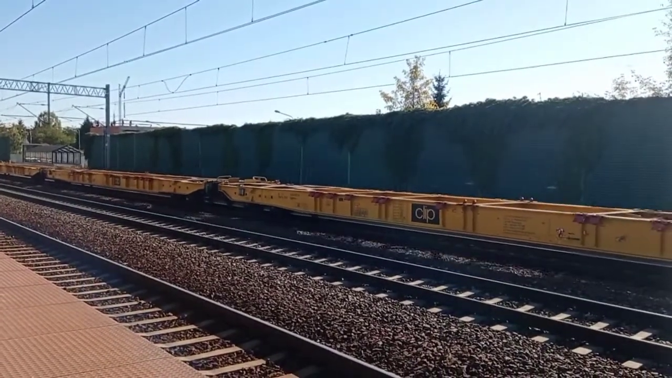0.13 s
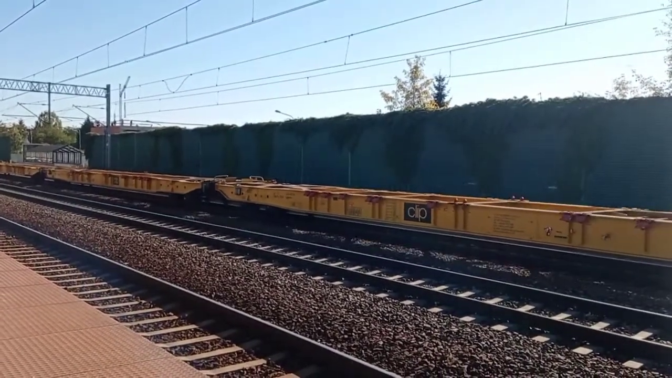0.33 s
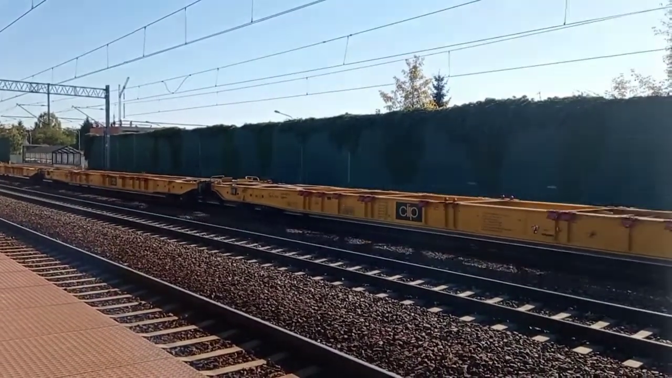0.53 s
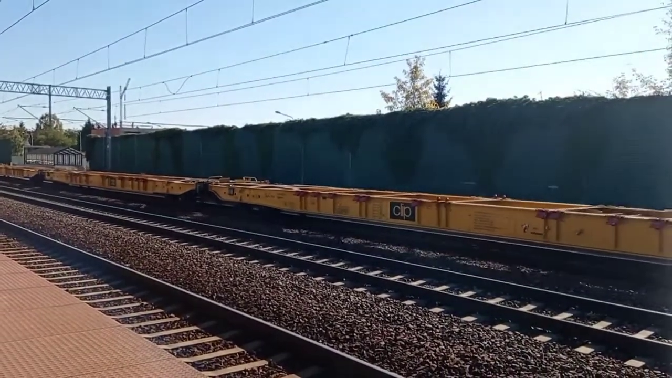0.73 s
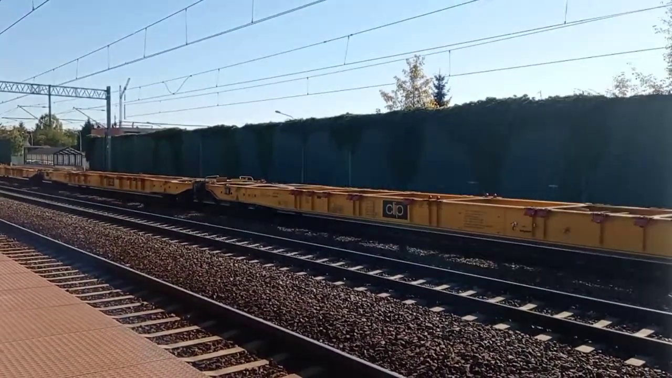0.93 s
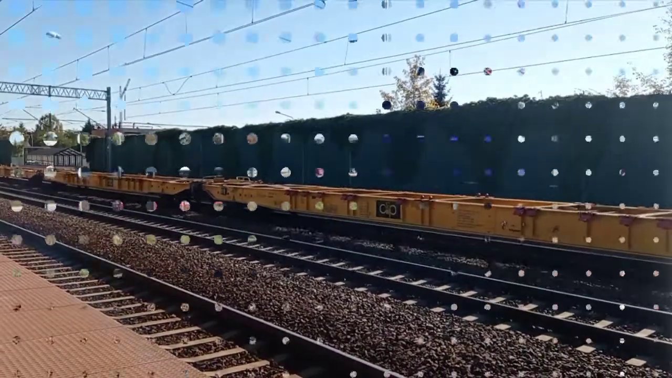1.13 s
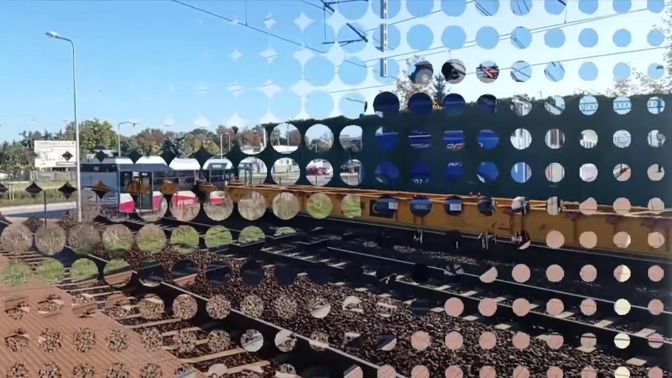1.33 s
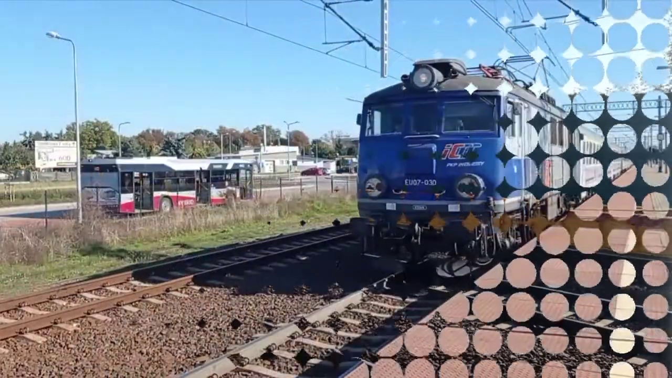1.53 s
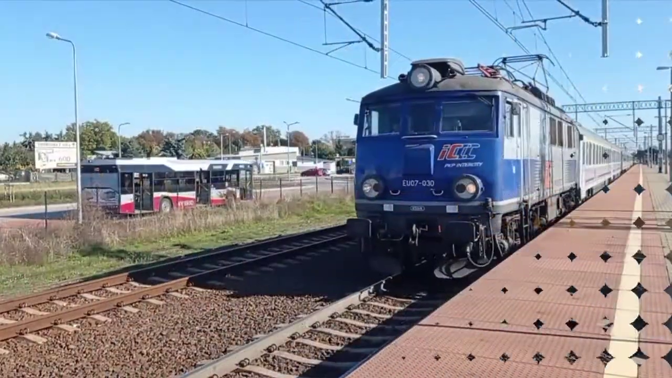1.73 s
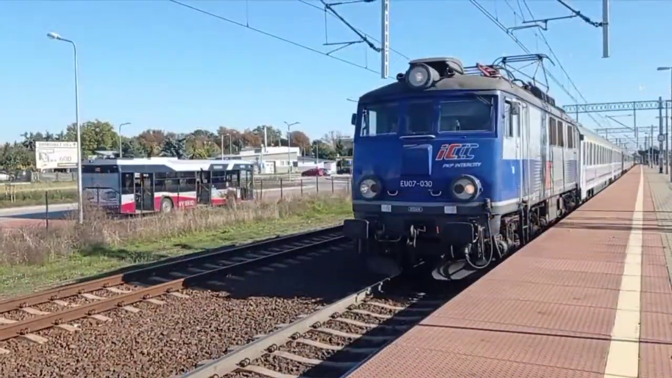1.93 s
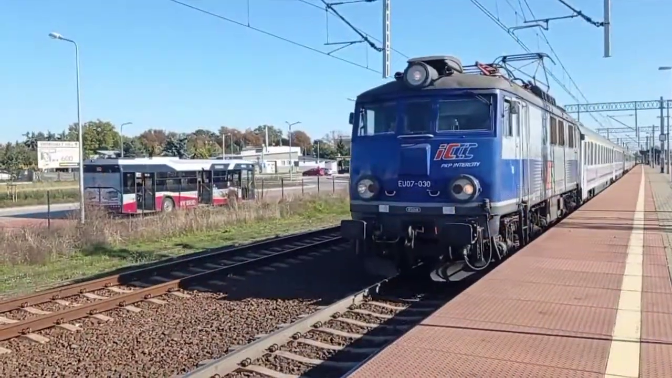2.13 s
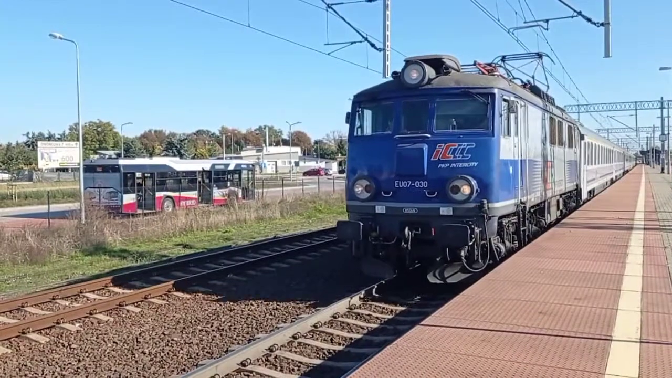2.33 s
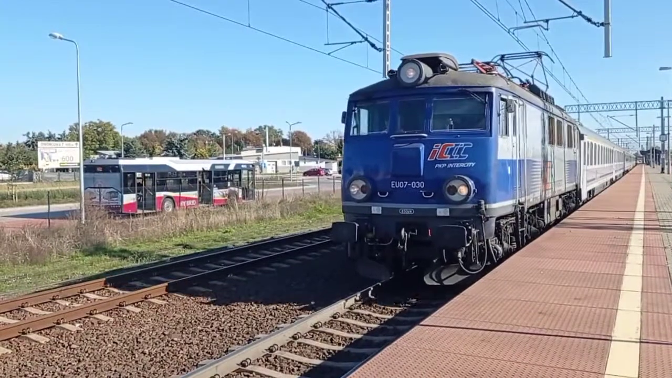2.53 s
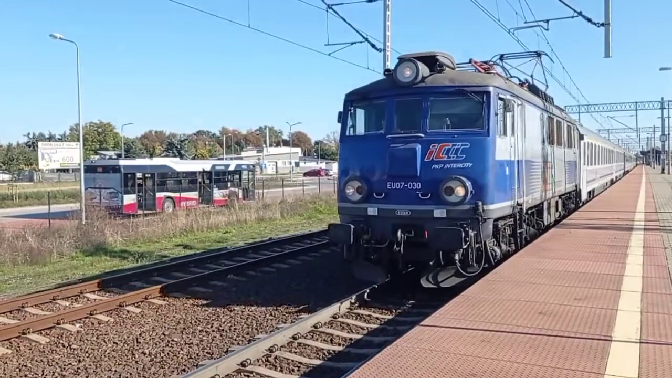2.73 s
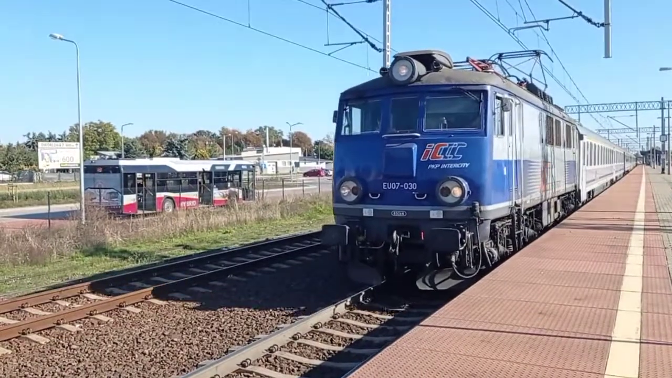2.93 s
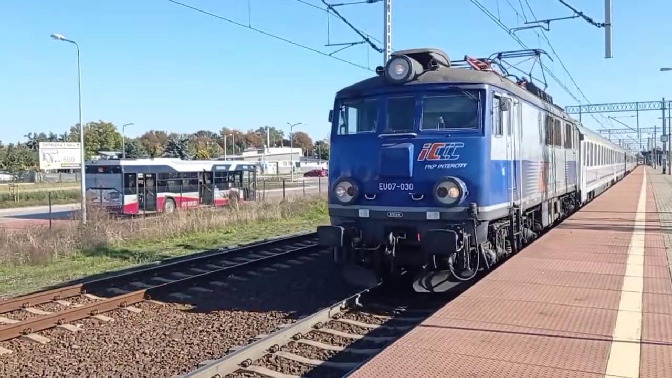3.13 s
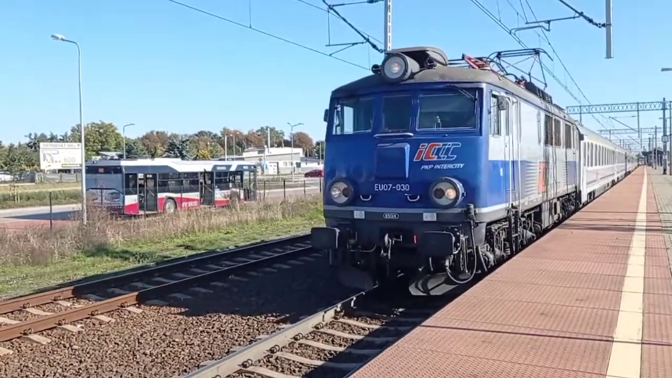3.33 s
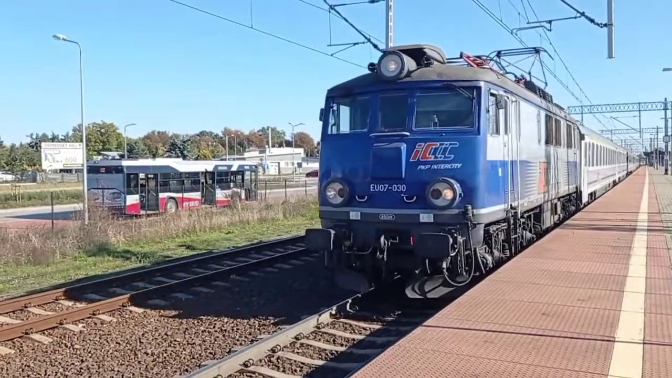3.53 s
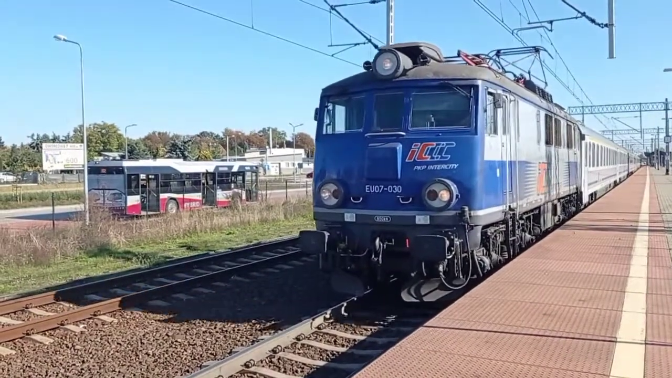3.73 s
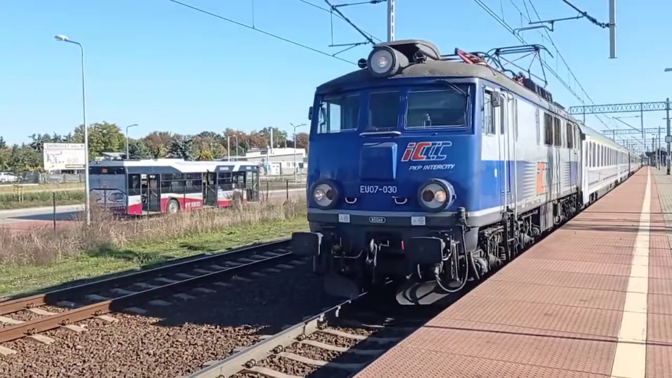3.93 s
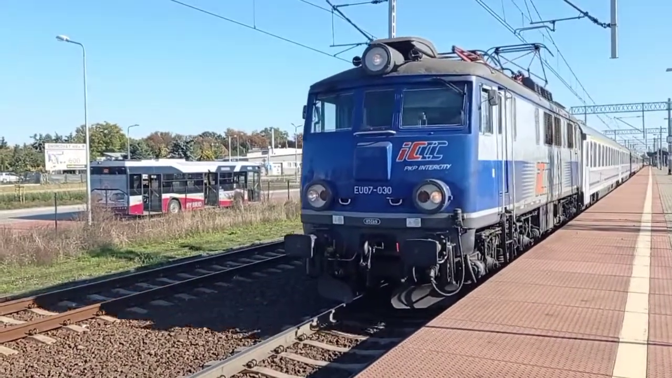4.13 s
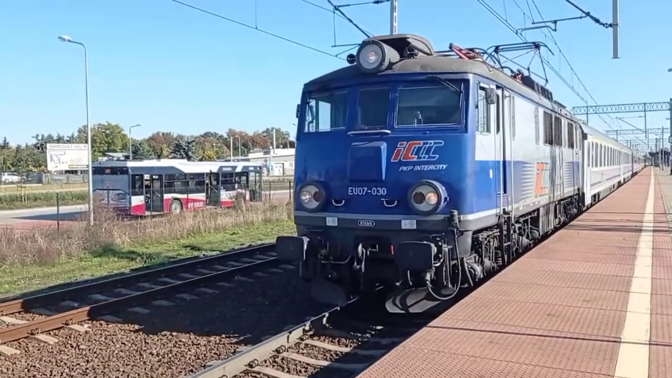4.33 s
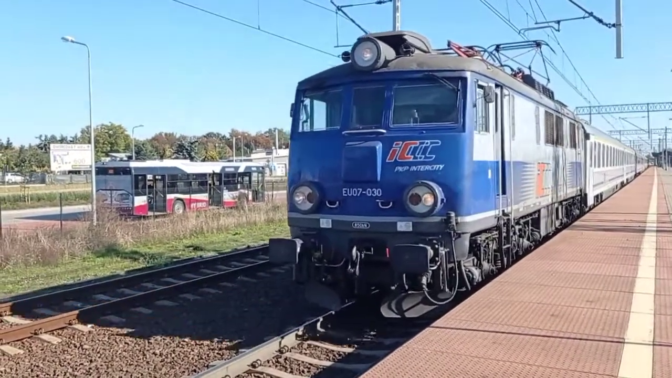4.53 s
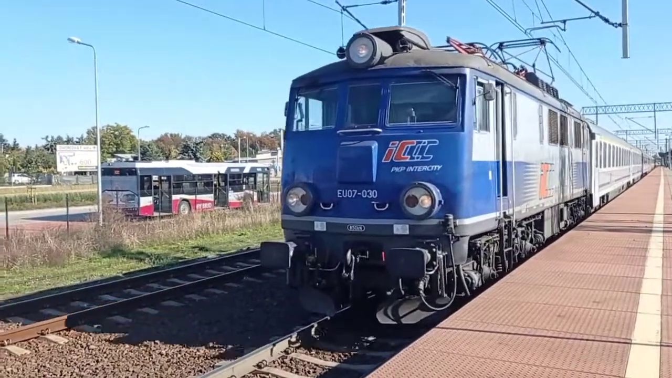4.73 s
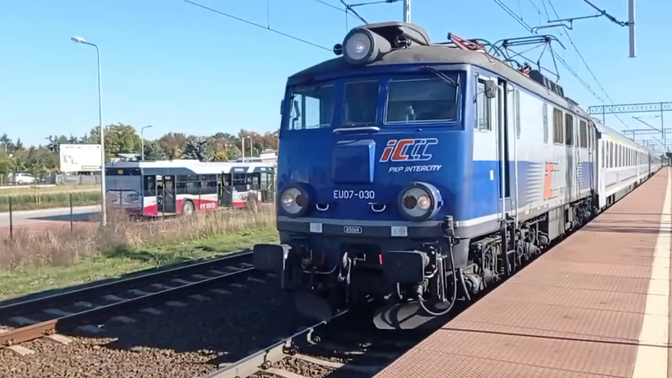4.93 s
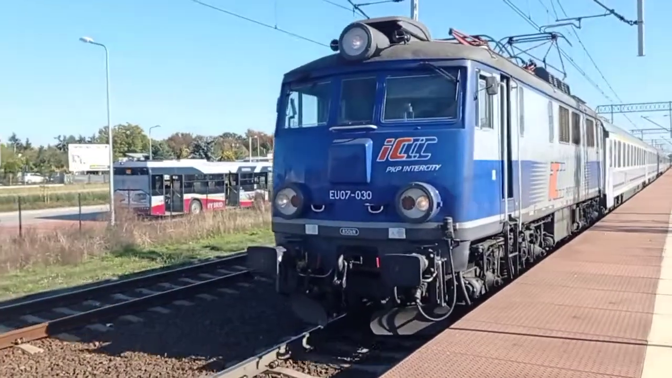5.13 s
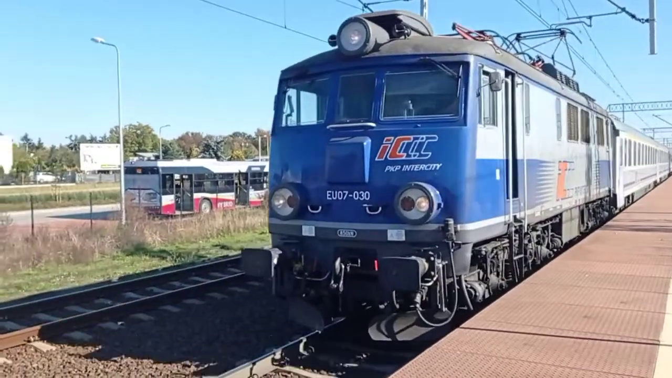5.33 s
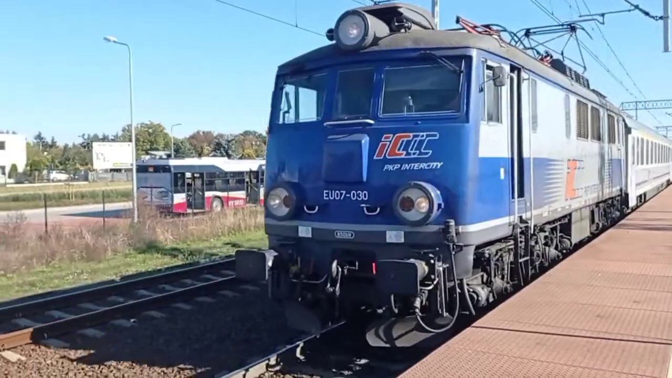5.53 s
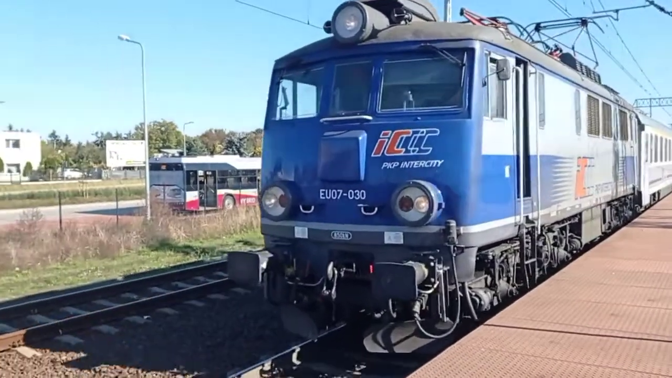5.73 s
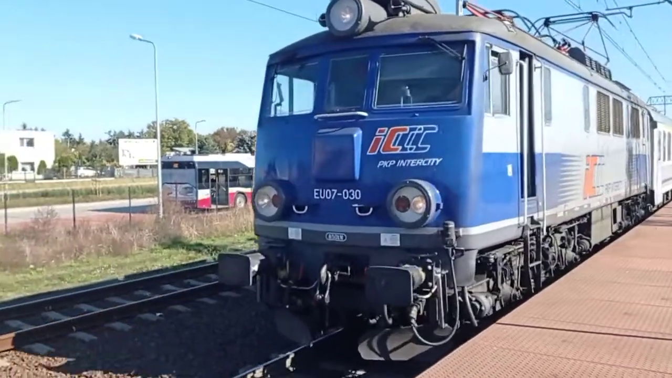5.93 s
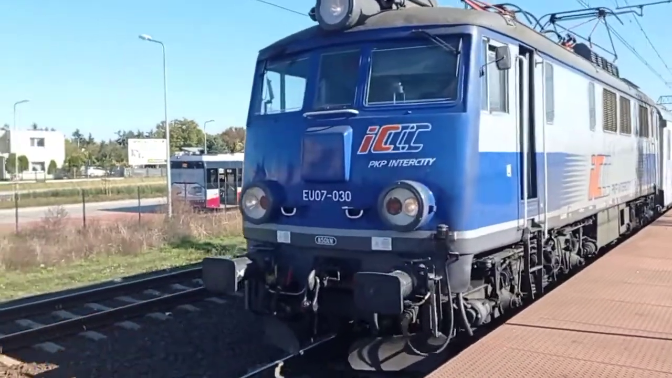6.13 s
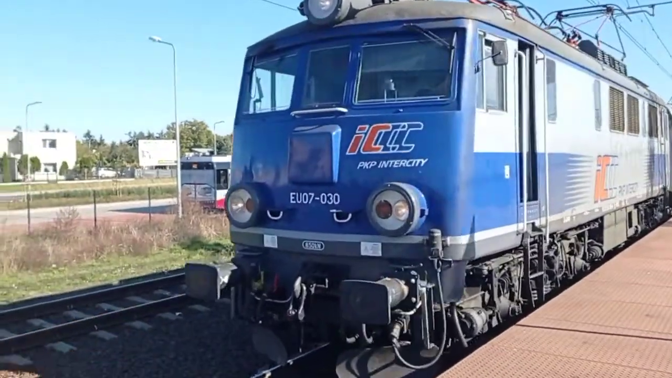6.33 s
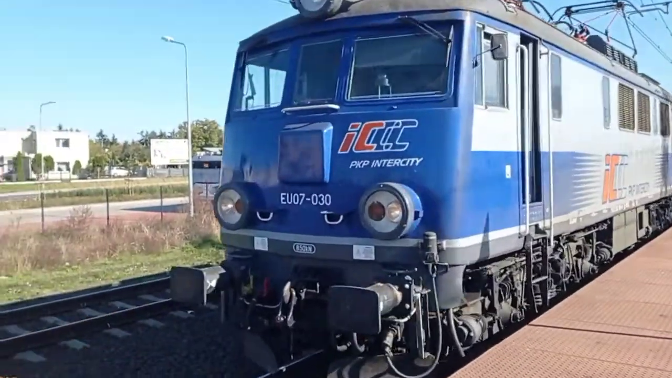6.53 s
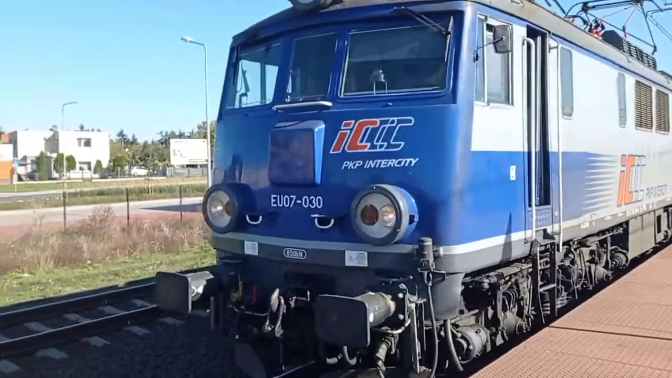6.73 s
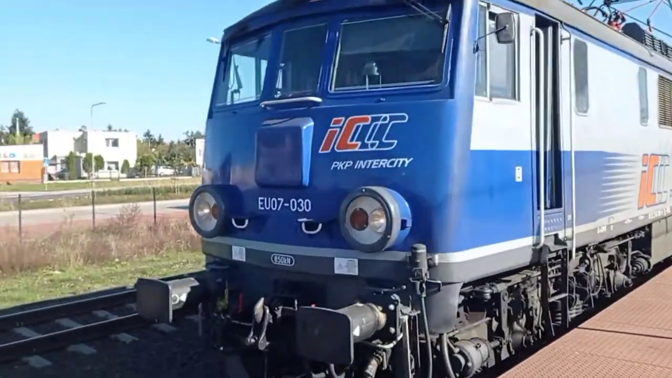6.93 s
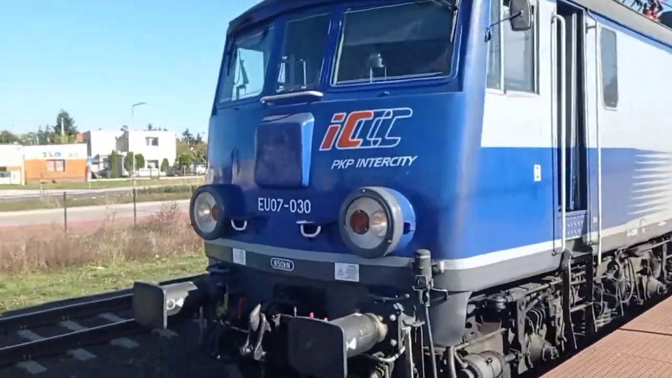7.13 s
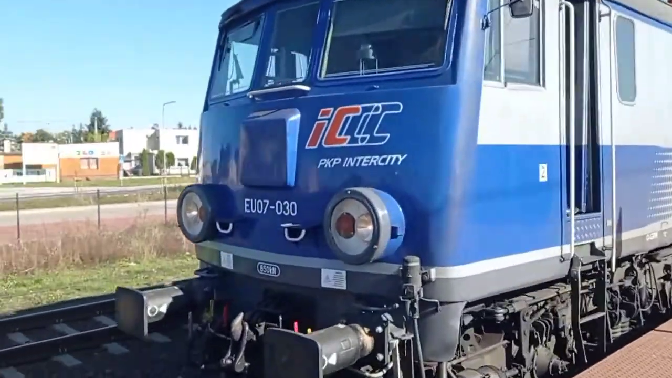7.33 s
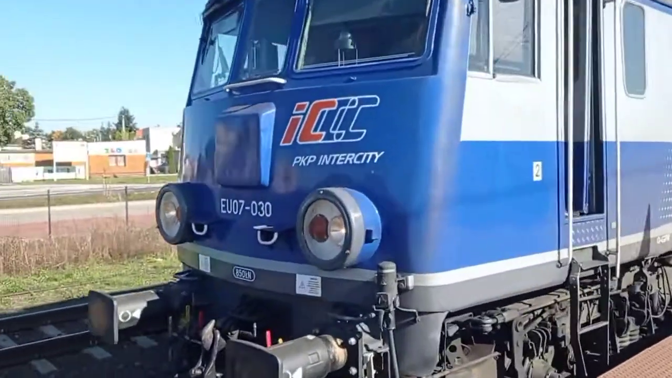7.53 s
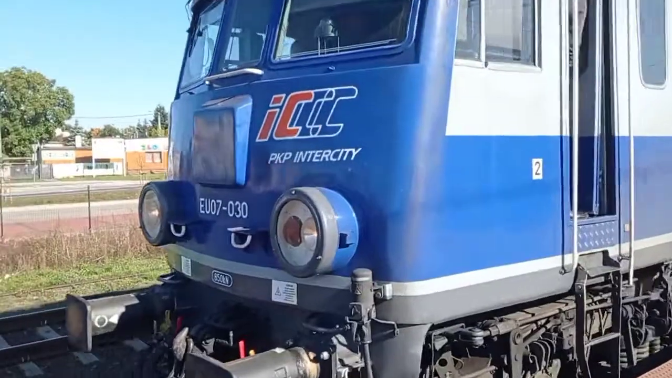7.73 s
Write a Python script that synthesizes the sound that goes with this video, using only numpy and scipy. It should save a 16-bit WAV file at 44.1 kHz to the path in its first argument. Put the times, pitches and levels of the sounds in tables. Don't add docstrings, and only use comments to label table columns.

```python
import sys
import numpy as np
from scipy import signal
from scipy.fft import rfft, irfft, next_fast_len
from scipy.io import wavfile

SR = 44100
rng = np.random.default_rng(int(sys.argv[2]) if len(sys.argv) > 2 else 0)


def convert_level_to_amplitude(level_db):
    exponent = np.asarray(level_db, float) / 20
    return 10 ** exponent


def transcribe(u):
    v = np.clip(np.atleast_2d(u).T, -1, 1)
    q = np.round(v * 32767).astype(np.int16)
    wavfile.write(sys.argv[1], SR, q)


N = 343539

# (time [s], tooth pitch [Hz], tooth level [dB], side tone level [dB])
GEAR_TONES = [(1.05, 207.5, -43.5, -46), (1.6, 221.5, -38.5, -36.5), (1.79, 225.5, -40, -36),
              (2.0, 231, -49, -56), (2.27, 237.9, -34.5, -35), (3.1, 250.2, -34.5, -31.5),
              (3.7, 255.8, -38, -42), (4.05, 260.5, -30, -43), (4.5, 266.2, -32.5, -38),
              (5.0, 278.5, -26.5, -51), (5.2, 285.7, -30, -40), (5.47, 284.8, -28, -36),
              (5.9, 293.2, -38.5, -31), (6.27, 303, -27.5, -26.5), (6.55, 302, -23, -23.5),
              (7.0, 306.4, -24.5, -26), (7.35, 306.1, -19.5, -25.5), (7.79, 307.4, -16, -28.5)]
# (time [s], level [dB])
APPROACH = [(1.05, -50.5), (2.2, -48.5), (3.1, -46.5), (4.1, -45), (4.4, -44), (5.2, -42.5), (5.75, -40.5),
            (6.4, -39.5), (7.2, -38), (7.79, -36.5)]
# (time [s], share [0-1])
NEARNESS = [
    (4.0, 0.16),
    (5.5, 0.39),
    (6.5, 0.6),
    (7.2, 0.73),
]

# (time [s], hold [s], peak level [dB])
LOW_SQUEALS = [(1.06, 0.035, -48.5), (1.11, .03, -51), (1.67, 0.074, -53.5), (1.76, 0.035, -47.5),
               (1.9, .05, -64), (2.1, 0.014, -52), (2.16, 0.017, -49), (2.34, 0.06, -45), (2.5, 0.028, -59),
               (2.65, 0.11, -41.5), (2.9, .04, -58), (3.07, 0.014, -51.5), (3.33, 0.09, -43),
               (3.5, 0.14, -43.5), (3.8, .02, -56), (3.95, .07, -46.5), (4.325, 0.028, -39),
               (4.48, .05, -58), (5.24, .03, -54), (5.57, 0.028, -46.5), (5.76, 0.036, -49),
               (6.1, 0.036, -46.5), (6.2, 0.091, -39), (6.465, .03, -48), (7.58, 0.022, -52)]
# (time [s], hold [s], peak level [dB])
HIGH_SQUEALS = [(2.0, 0.018, -61), (2.22, 0.025, -62), (2.33, 0.028, -52), (3.25, 0.011, -49),
                (3.88, 0.13, -57), (4.15, .04, -59), (4.5, .05, -55), (5.46, 0.091, -42.5),
                (5.66, .02, -52), (5.72, .03, -51), (5.79, .02, -50), (6.035, 0.011, -43.5),
                (6.2, .08, -57), (6.46, 0.027, -52), (6.73, 0.023, -51), (7.37, 0.018, -60),
                (7.58, .12, -52)]
# (time [s], pitch [Hz])
HIGH_SQUEAL_PITCH = [(1.0, 6820), (2.3, 6865), (3.3, 6825), (4.5, 6815), (5.4, 6905), (5.8, 6890),
                     (6.05, 6850), (7.0, 6850)]
# (pitch multiple [1], level
# [dB], steepness of growth [1])
SQUEAL_PARTIALS = [(1.135, -27, 1.5), (1.5, -37, 1.5), (2.0, -44, 1.6), (2.06, -55, 1.6), (2.36, -59, 1.5)]

# (frequency [Hz], level [dB per Hz])
RUMBLE_FAR = [(13, -61), (22, -27), (38, -26), (81, -4), (183, -5), (241, -3), (257, -11.5), (285, -3),
              (375, -10), (500, -26.5), (650, -55.5), (1100, -120)]
RUMBLE_NEAR = [(13, -65.5), (22, -46.5), (102, -14), (156, -13), (198, -10), (244, -3.5), (274, -11),
               (296, -16.5), (316, -19), (347, -9), (500, -32.5), (650, -54.5), (1100, -120)]
BLOWER_FAR = [(240, -28.5), (400, 0), (460, -3), (493, -3.5), (535, -7), (583, -4), (698, 1.5), (917, 2.5),
              (1490, -17), (1600, -15), (2080, -44.5), (3520, -120)]
BLOWER_NEAR = [(240, -26), (400, 3.5), (522, -5.5), (573, 1.5), (600, 2), (678, -7), (770, -4.5), (944, -8),
               (1220, -10), (1600, -28.5), (2080, -47.5), (3520, -120)]
HISS_FAR = [(820, -29), (1400, -5.5), (1520, -9), (1850, 3.5), (2140, -10), (2360, -4.5), (2590, -3),
            (2860, -11.5), (3390, -7.5), (4410, -19), (5850, -18), (6690, -13), (7600, -26), (9880, -53.5),
            (16700, -120)]
HISS_NEAR = [(820, -26.5), (1400, 3.5), (1570, -4), (2100, -3.5), (2410, 0), (2990, -10), (4160, -14.5),
             (4440, -19), (5300, -12), (6150, -19), (6690, -14), (7600, -23.5), (9880, -53), (16700, -120)]
AIR_FAR = [(6000, -35), (7600, 3.5), (8600, -3), (9900, -12), (10600, -18), (12000, -26.5), (13700, -33.5),
           (15000, -30), (16500, -33)]
AIR_NEAR = [(6000, -32), (7600, -6), (8600, -4), (9900, -5.5), (10600, -13), (12000, -17), (13700, -26.5),
            (15000, -14.5), (16500, -23.5)]
# (time [s], level over steady rumble [dB])
LURCHES = [(1.262, 10.5), (1.55, 4), (2.291, 6), (3.059, 0.5), (4.38, 0.5), (5.04, -0.5), (6.16, 4.5),
           (6.32, 4), (6.569, 7.5), (6.9, -1.5), (7.1, 1), (7.31, 3)]

# (time [s], peak level [dB])
TICKS = [
    (1.254, -68),
    (1.268, -62),
    (6.7087, -51.5),
]
# (time [s], hiss level [dB], time to die away by 60 dB [s], ringing pitch [Hz], ringing level [dB])
JOINTS = [
    (.055, -64, 0.25, 5200, -69),
    (.15, -62, 0.42, 6650, -63),
    (.28, -63, 0.88, 6700, -82),
    (.43, -58, 0.3, 5900, -73),
    (.597, -56.5, 0.28, 6040, -64),
    (.67, -71, 0.15, 4560, -60),
    (.748, -61, 0.23, 6750, -62),
    (.848, -57, 0.27, 4370, -62),
    (.91, -65, 0.39, 5800, -60),
]
# (frequency [Hz], level [dB per Hz])
RAIL_HISS = [(2500, -15), (3500, -5.5), (4500, -6), (5500, -9.5), (6900, -13.5), (8300, -25), (9300, -29),
             (10300, -42), (11500, -70), (13000, -110)]
# (frequency [Hz], level [dB per Hz])
FAR_ROLL = [(290, -32), (500, -7), (662, -8), (1410, -10.5), (1850, -9), (2150, -9.5), (2510, -13),
            (2950, -14), (3320, -19), (3800, -21.5), (4940, -56), (8360, -120)]

# (time [s], peak level [dB], pitch [Hz], sharp edge level [dB])
WIND_BUMPS = [(0.131, -20, 112, -28), (0.189, -21.5, 130, -35), (0.289, -28, 238, -19),
              (0.397, -31, 212, -23), (0.457, -21.5, 147, -24), (0.574, -21.5, 279, -18),
              (0.712, -23, 187, -21), (0.775, -20.5, 172, -30), (0.799, -42, 102, -24),
              (0.821, -17, 168, -39), (0.869, -36, 145, -26), (0.99, -36, 195, -28), (1.101, -30, 194, -26),
              (1.248, -19.5, 330, -16), (1.26, -18.5, 280, -25)]
# (time [s], level [dB])
GUSTS = [(0.0, -42), (0.12, -35.5), (0.41, -36.5), (0.52, -42), (0.584, -33), (0.63, -38.5), (0.75, -31),
         (0.86, -39), (1.026, -34.5)]
# (frequency [Hz], level [dB per Hz])
WIND = [(18, -61), (30, -37), (54, -15.5), (114, -8.5), (156, -11), (196, -12), (280, -16), (314, -19),
        (900, -49), (1170, -66), (1980, -120)]

CUT_S, RESUME_S = 1.02685, 1.0481


def gears():
    tooth_hz, tooth_db, side_db = in_time(GEAR_TONES)
    tooth_db = tooth_db + 1.9 * drift(5.0)
    side_db = side_db + 1.9 * drift(5.0)
    side_hz = 0.95 * tooth_hz + 0.55 * drift(8)
    tooth_hz = tooth_hz + 0.55 * drift(8)

    out = convert_level_to_amplitude(tooth_db) * tone(tooth_hz, 1.8, 14)
    out += convert_level_to_amplitude(side_db) * tone(side_hz, 1.8, 14)
    out += convert_level_to_amplitude(tooth_db - 30) * tone(tooth_hz, 4, 3, multiple=2)
    side_octave_db = side_db - 25 + 16 * in_time(NEARNESS)[0]
    out += convert_level_to_amplitude(side_octave_db) * tone(side_hz, 1.0, 5, multiple=2)

    frame_hz, frame_width_hz = 835, 30
    for pitch_hz, level_db in ((tooth_hz, -44), (side_hz, -40)):
        ringing = np.exp(-0.5 * ((3 * pitch_hz - frame_hz) / frame_width_hz) ** 2)
        out += convert_level_to_amplitude(level_db) * ringing * tone(pitch_hz, 2, 5, multiple=3)
    return out


def squeal():
    hiss_db = in_time(APPROACH)[0]
    slip_db = hiss_db - 19
    low_db = catches_db(LOW_SQUEALS, 398, 162.5, slip_db)
    high_db = catches_db(HIGH_SQUEALS, 498, 497.5, slip_db)
    onset_db = hiss_db - 23
    low = convert_level_to_amplitude(low_db) * np.clip((low_db - onset_db) / 10, 0, 1)
    high = convert_level_to_amplitude(high_db) * np.clip((high_db - onset_db) / 10, 0, 1)

    sag = np.clip((low_db - onset_db - 14) / 14, 0, 1)
    low_hz = 6450 - 60 * sag + 8 * drift(15)
    high_hz = in_time(HIGH_SQUEAL_PITCH)[0]
    low_chatter, high_chatter = chatter(50), chatter(30)
    low_wave = low_chatter * np.exp(2j * np.pi * np.cumsum(low_hz) / SR)
    high_wave = high_chatter * np.exp(2j * np.pi * np.cumsum(high_hz) / SR)
    out = 1.5 * low * convert_level_to_amplitude(1.6 * drift(120)) * low_wave.real
    out += 1.78 * high * high_wave.real

    near = in_time(NEARNESS)[0]
    for multiple, level_db, steepness in SQUEAL_PARTIALS:
        growth = np.minimum(low / convert_level_to_amplitude(-42), 1) ** steepness
        beaming = convert_level_to_amplitude(-10 * near * (multiple - 1.5))
        strength = convert_level_to_amplitude(level_db - 42) * growth * abs(low_chatter) * beaming
        pitch_hz = low_hz * multiple + 45 * drift(60)
        out += strength * convert_level_to_amplitude(2 * drift(3)) * tone(pitch_hz, 4.0, 20)
    return out


def chatter(rate_hz):
    return (drift(rate_hz) + 1j * drift(rate_hz) + 0.4) / 1.5


def catches_db(events, rise_db_per_s, fall_db_per_s, floor_db):
    t = np.arange(0, N / SR, 0.002)
    s, hold_s, peak_db = np.transpose(events)[:, :, None]
    climb_db = rise_db_per_s * np.maximum(s - t, 0)
    fall_db = fall_db_per_s * np.maximum(t - s - hold_s, 0)
    loudest_db = (peak_db - climb_db - fall_db).max(axis=0)
    restless_db = floor_db + 1.5 * drift(5.0)
    return np.maximum(restless_db, np.interp(np.arange(N) / SR, t, loudest_db))


def body_noise():
    t = np.arange(N) / SR
    near = np.clip(in_time(NEARNESS)[0], 0, 1)
    hiss_db = in_time(APPROACH)[0]
    rise_db = hiss_db + 50
    lurch_db = sum(db * np.exp(-((t - s) / 0.03) ** 2) for s, db in LURCHES)
    rumble_db = -34.5 + 0.88 * rise_db + 0.05 * drift(1.4) + lurch_db
    blower_db = -39 + 0.93 * rise_db + 0.45 * drift(5.8)
    layers = [(RUMBLE_FAR, RUMBLE_NEAR, rumble_db),
              (BLOWER_FAR, BLOWER_NEAR, blower_db),
              (HISS_FAR, HISS_NEAR, hiss_db + 0.44),
              (AIR_FAR, AIR_NEAR, hiss_db - 29.5 + 1.5 * near)]
    out = 0
    for far_colour, near_colour, level_db in layers:
        distant, beside = coloured([far_colour, near_colour], 0.7, count=5)
        out = out + convert_level_to_amplitude(level_db) * ((1 - near) * distant + near * beside)
    return out


def ticks():
    out = np.zeros(N)
    for s, peak_db in TICKS:
        out[round(s * SR)] = convert_level_to_amplitude(peak_db + 6.0)
    return signal.sosfilt(signal.butter(2, 5000, "high", fs=SR, output="sos"), out)


def rail_joints():
    t = np.arange(N) / SR
    hiss = np.full(N, convert_level_to_amplitude(-74))
    rings = np.zeros(N)
    ring_len = 2 * SR
    for s, hiss_db, t60, hz, ring_db in JOINTS:
        since = np.clip(t - s, 0, 1)
        shape = (1 - np.exp(-since / 0.0059)) * convert_level_to_amplitude(-60 * since / t60)
        hiss += convert_level_to_amplitude(hiss_db - 4.0) * shape
        ring = band_noise(hz, 220, ring_len)
        rings[:ring_len] += convert_level_to_amplitude(ring_db - 2.0) * shape[:ring_len] * ring
    rings += convert_level_to_amplitude(3.5) * hiss * band_noise(2140, 210, N)
    return rings + hiss * coloured([RAIL_HISS], 3.0, count=12)[0]


def far_train():
    return convert_level_to_amplitude(-56) * coloured([FAR_ROLL], 1.0, count=4)[0] + rail_joints()


def wind_bumps():
    out = np.zeros(N)
    t = np.arange(-600, 1200) / SR
    chances = rng.random((len(WIND_BUMPS), 2))
    for (s, peak_db, hz, edge_db), (twist, phase) in zip(WIND_BUMPS, chances):
        width_s = np.where(t < 0, 0.005, 0.008)
        push = np.exp(-(t / width_s) ** 2) * np.cos(2 * np.pi * (hz * t + phase))
        knock = convert_level_to_amplitude(9) * np.exp(-(t / 0.003) ** 2) * np.cos(2 * np.pi * (500 * t + twist))
        at = round((s + 0.008) * SR)
        out[at - 600:at + 1200] += convert_level_to_amplitude(peak_db - 4.5) * (push + convert_level_to_amplitude(edge_db) * knock)
    return out


def platform_wind():
    t = np.arange(N) / SR
    wind = convert_level_to_amplitude(in_time(GUSTS)[0] - 3) * coloured([WIND], 2.0, count=4)[0]
    last_push = convert_level_to_amplitude(-34) * np.exp(-abs(t - CUT_S) / 0.0015)
    return wind + last_push


def in_time(rows):
    s, *columns = np.transpose(rows)
    return [np.interp(np.arange(N) / SR, s, column) for column in columns]


def rms_one(x):
    return x / np.sqrt(np.mean(np.abs(x) ** 2) + 1e-20)


def drift(rate_hz):
    r = np.exp(-40 * np.pi * rate_hz / SR)
    noise = rng.standard_normal(N // 20 + 4002)
    slow = signal.lfilter([1], [1, -2 * r, r * r], noise)[4000:]
    return np.interp(np.arange(N) / 20, np.arange(len(slow)), rms_one(slow))


def tone(hz, wobble_db, rate_hz, multiple=1):
    turns = multiple * np.cumsum(hz) / SR + rng.random()
    return np.sqrt(2) * np.sin(2 * np.pi * turns) * convert_level_to_amplitude(wobble_db * drift(rate_hz))


def band_noise(hz, half_width_hz, length):
    band = signal.butter(2, [hz - half_width_hz, hz + half_width_hz], "band", fs=SR, output="sos")
    return rms_one(signal.sosfilt(band, rng.standard_normal(length)))


def coloured(spectra, patchy_db, count=6):
    size = next_fast_len(N)
    hz = np.maximum(np.arange(size // 2 + 1) * SR / size, 1)
    white = rfft(rng.standard_normal(size))
    together = drift(6.5)
    edges = np.geomspace(spectra[0][0][0], spectra[0][-1][0], count + 1)
    flicker = [convert_level_to_amplitude(patchy_db * (0.42 * together + drift(12.0))) for k in range(count)]
    out = []
    for points in spectra:
        point_hz, point_db = np.transpose(points)
        shape = white * convert_level_to_amplitude(np.interp(np.log(hz), np.log(point_hz), point_db))
        place = np.interp(np.log(hz), np.log(edges), np.arange(count + 1)) - 0.5
        place = np.clip(place, 0, count - 1)
        total = np.zeros(N)
        for k in range(count):
            share = np.clip(1 - abs(place - k), 0, 1)
            total += flicker[k] * irfft(shape * share, size)[:N]
        out.append(rms_one(total))
    return out


def scene():
    t = np.arange(N) / SR
    fade = np.clip((t - 1.033) / (1.38 - 1.033), 0, 1)
    bumps = wind_bumps()
    locomotive = fade * (gears() + squeal() + body_noise()) + bumps
    platform = far_train() + platform_wind() + bumps
    after_cut = np.where(t < RESUME_S, convert_level_to_amplitude(-35) * platform, locomotive)
    return np.where(t < CUT_S, platform, after_cut)[None] + ticks()


def band_limit(x):
    return signal.sosfilt(signal.butter(12, 15740, fs=SR, output="sos"), x)


def record(dry):
    heard = signal.sosfilt(signal.butter(2, 42, "high", fs=SR, output="sos"), dry)
    heard = heard + convert_level_to_amplitude(-96.5) * rng.standard_normal(N)
    return band_limit(heard)


dry = scene()
out = record(dry)
transcribe(out)
```